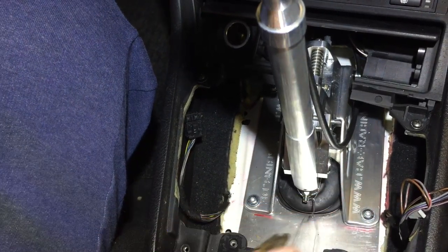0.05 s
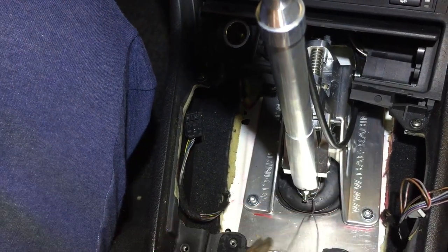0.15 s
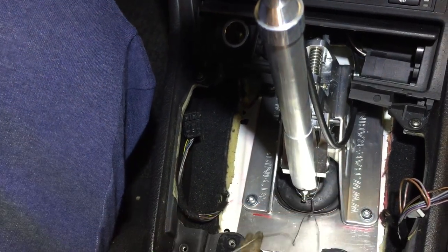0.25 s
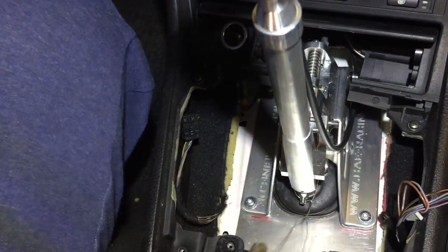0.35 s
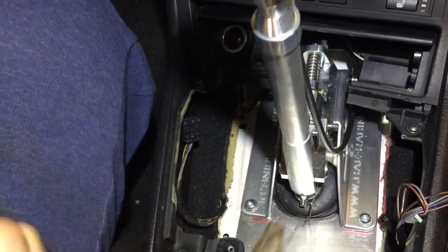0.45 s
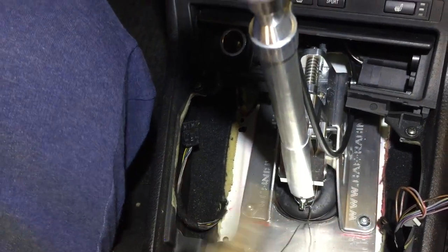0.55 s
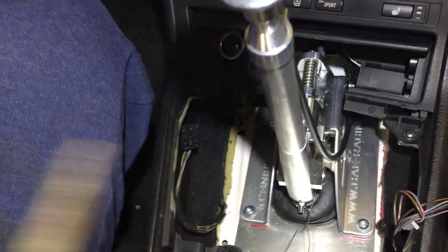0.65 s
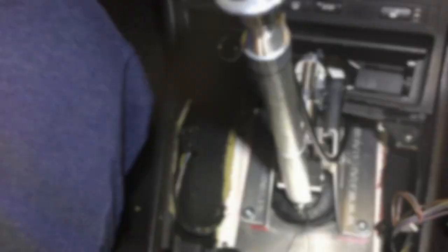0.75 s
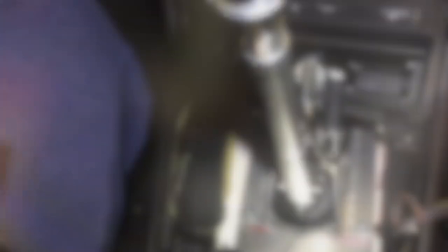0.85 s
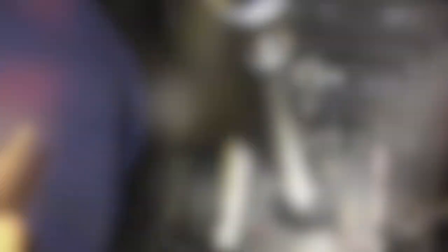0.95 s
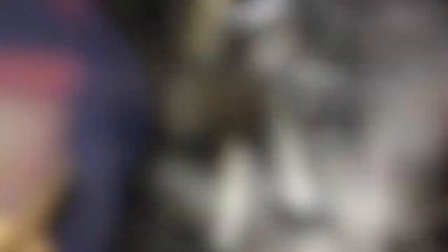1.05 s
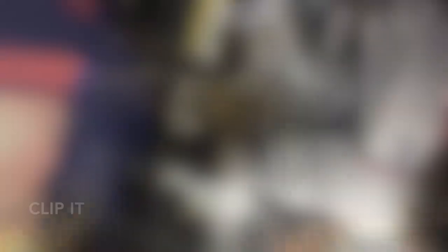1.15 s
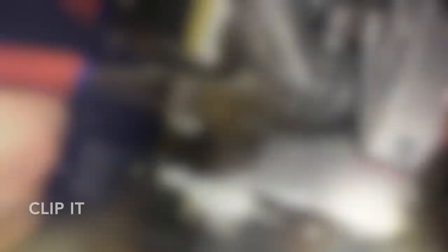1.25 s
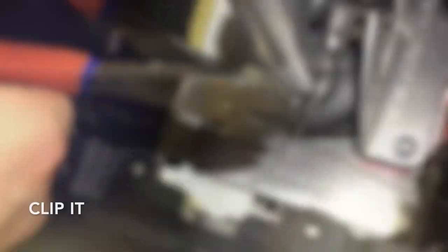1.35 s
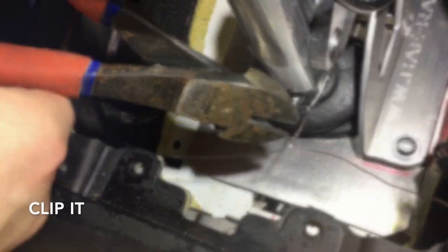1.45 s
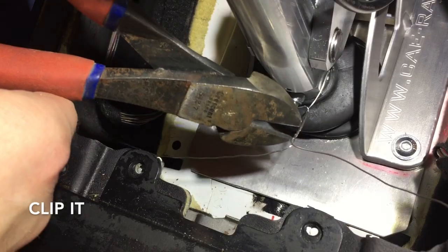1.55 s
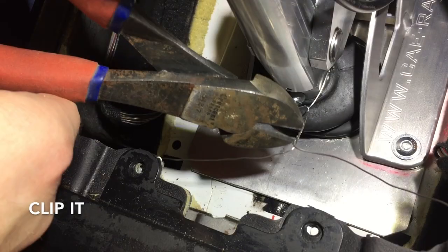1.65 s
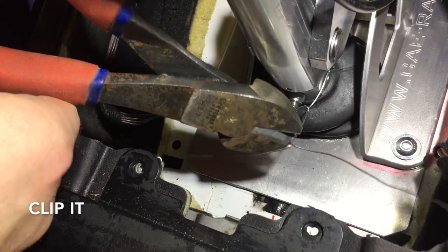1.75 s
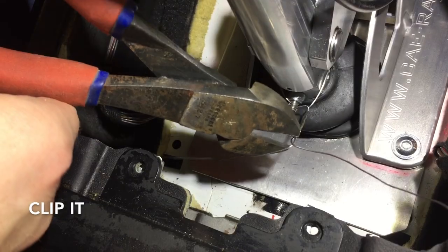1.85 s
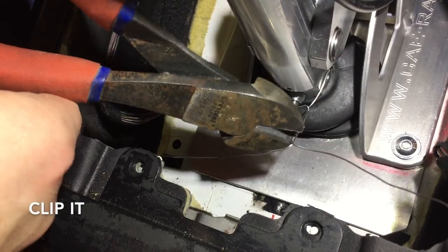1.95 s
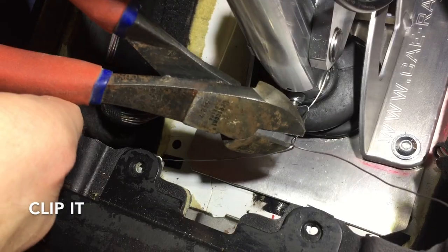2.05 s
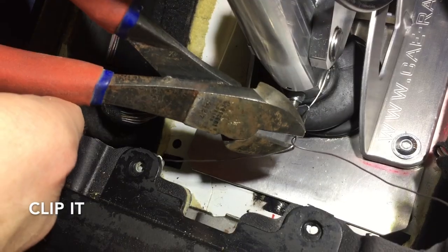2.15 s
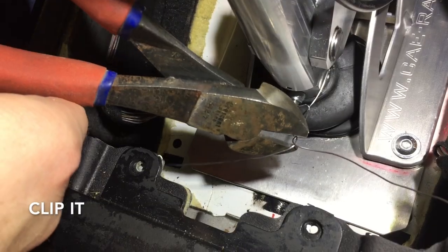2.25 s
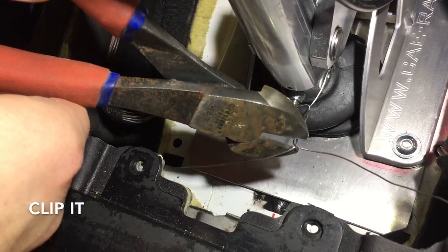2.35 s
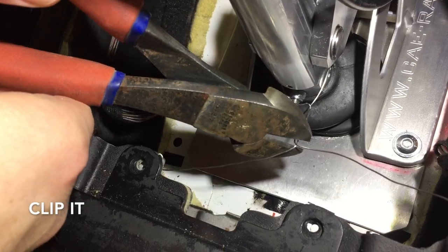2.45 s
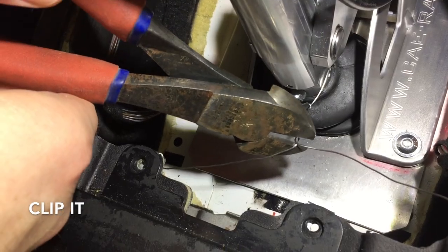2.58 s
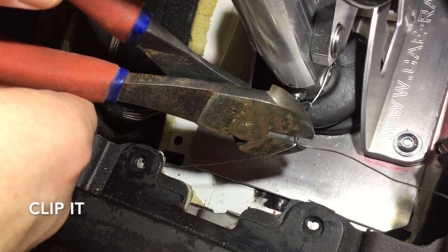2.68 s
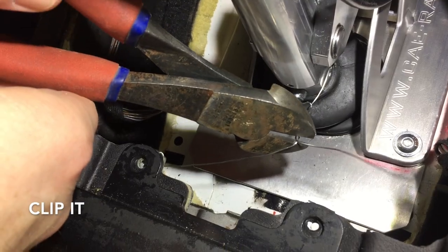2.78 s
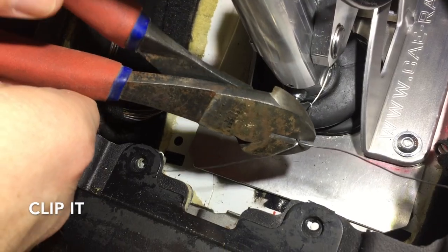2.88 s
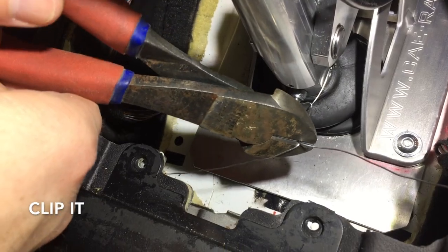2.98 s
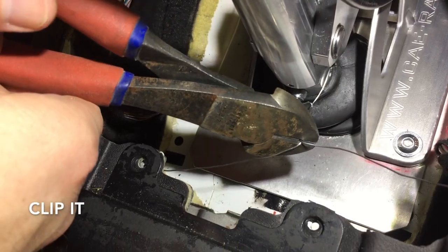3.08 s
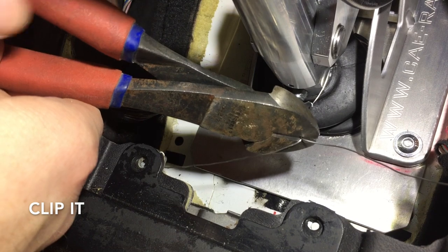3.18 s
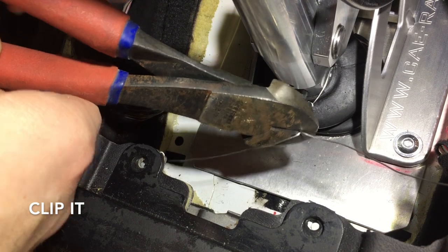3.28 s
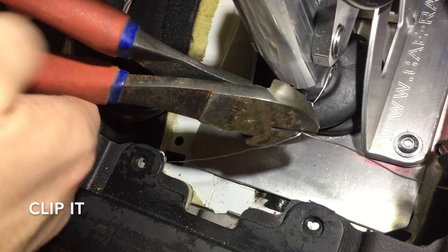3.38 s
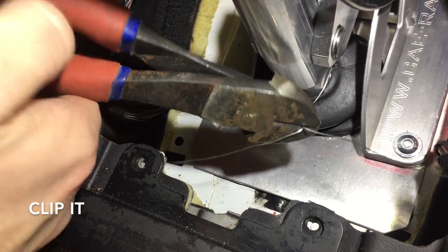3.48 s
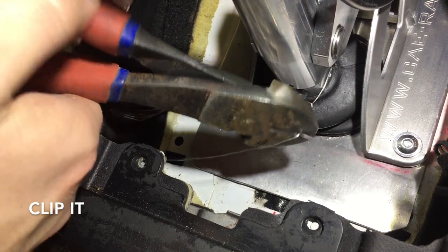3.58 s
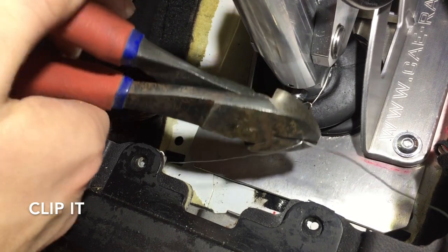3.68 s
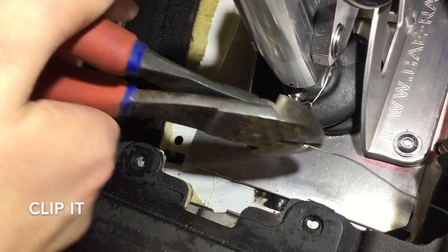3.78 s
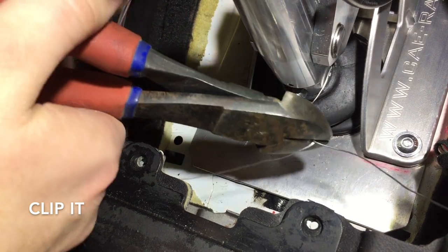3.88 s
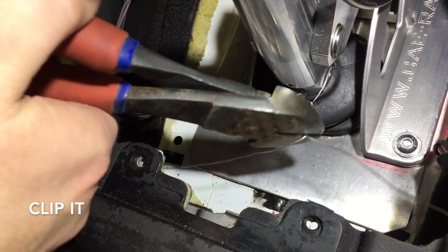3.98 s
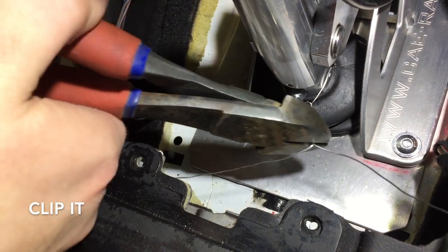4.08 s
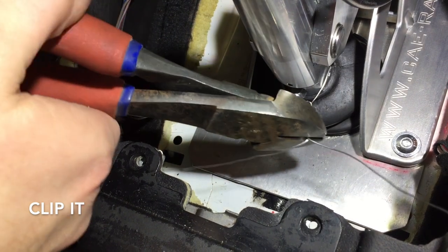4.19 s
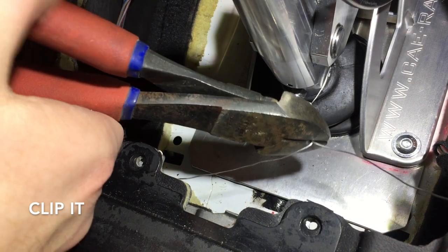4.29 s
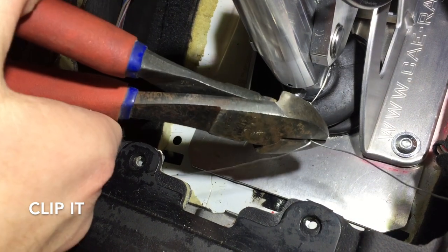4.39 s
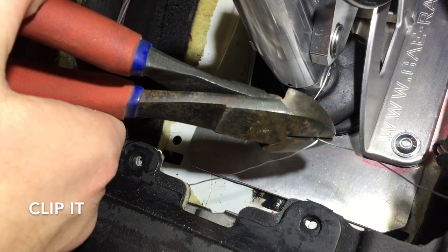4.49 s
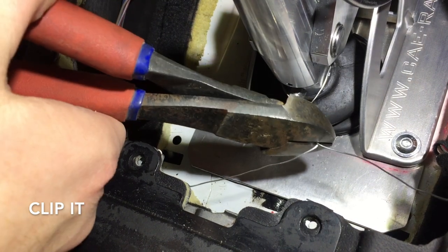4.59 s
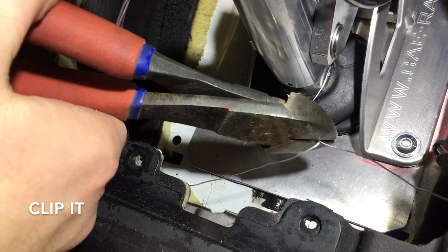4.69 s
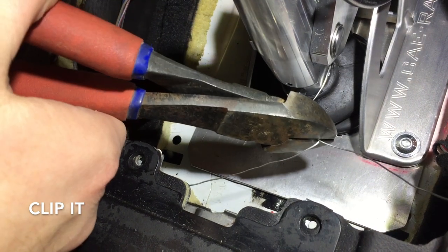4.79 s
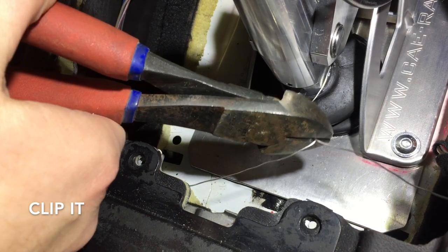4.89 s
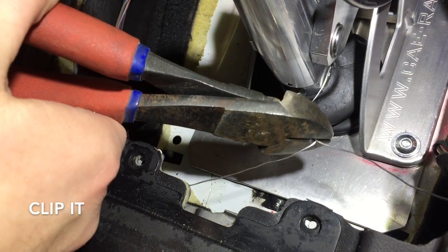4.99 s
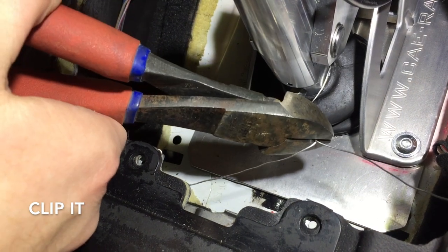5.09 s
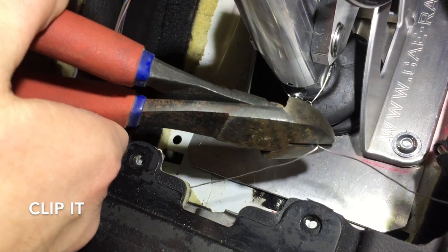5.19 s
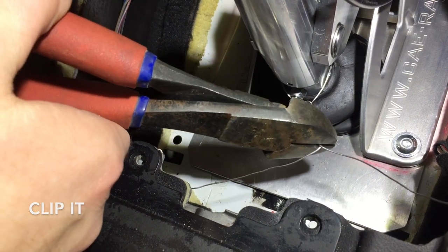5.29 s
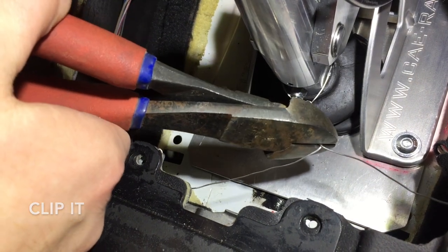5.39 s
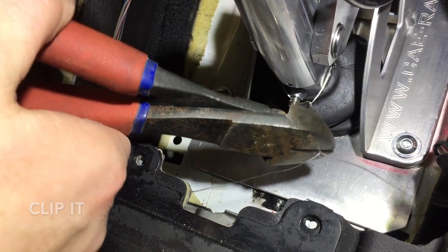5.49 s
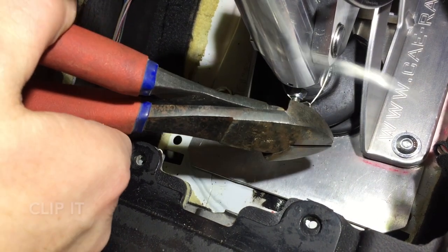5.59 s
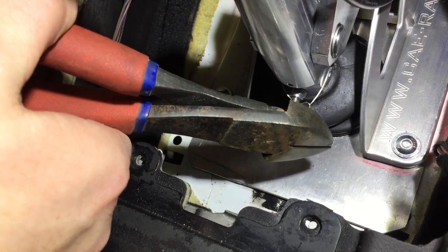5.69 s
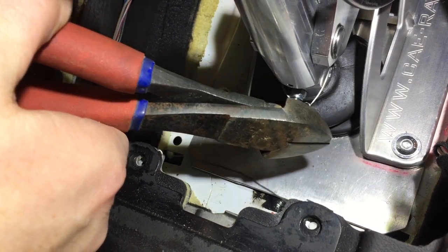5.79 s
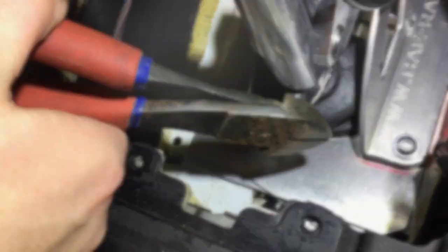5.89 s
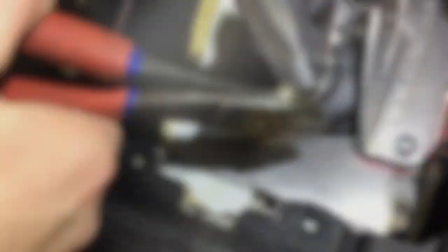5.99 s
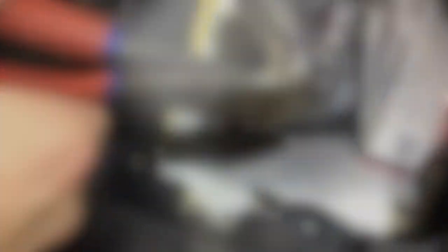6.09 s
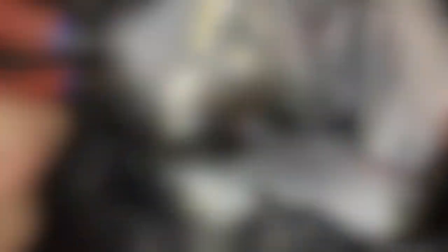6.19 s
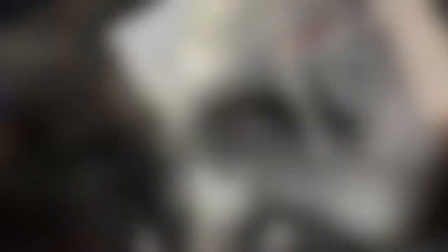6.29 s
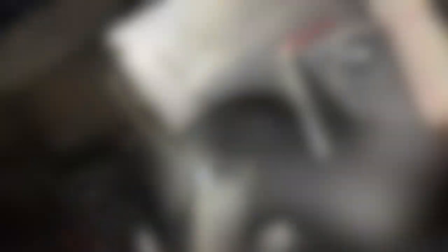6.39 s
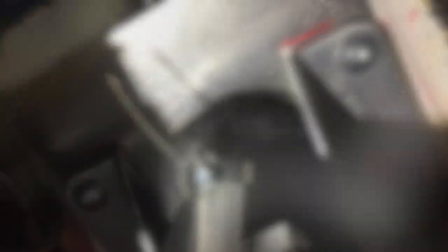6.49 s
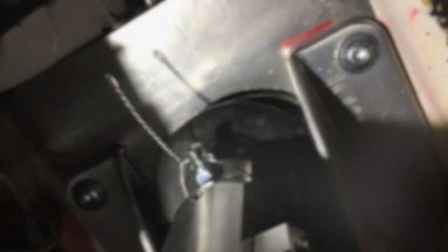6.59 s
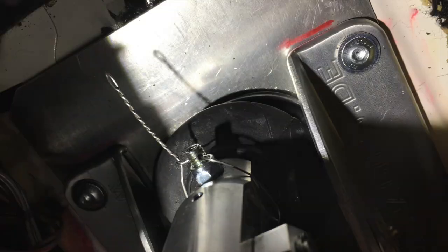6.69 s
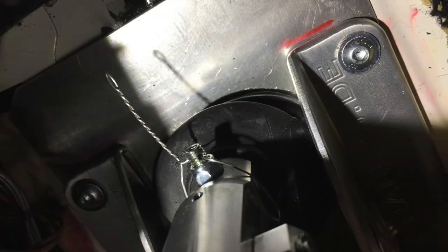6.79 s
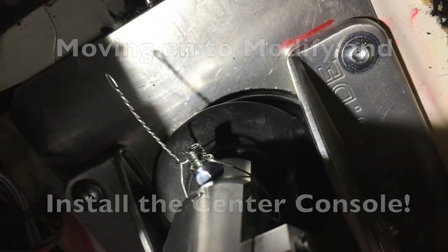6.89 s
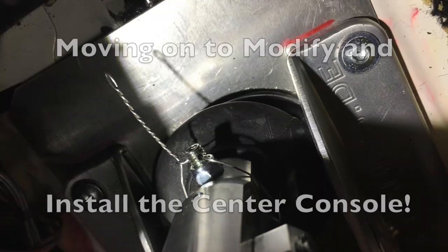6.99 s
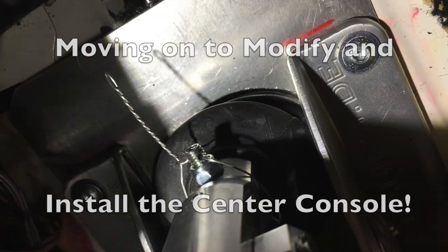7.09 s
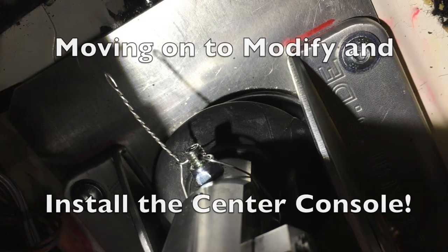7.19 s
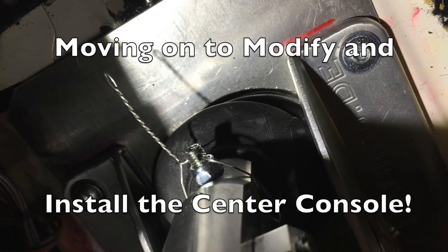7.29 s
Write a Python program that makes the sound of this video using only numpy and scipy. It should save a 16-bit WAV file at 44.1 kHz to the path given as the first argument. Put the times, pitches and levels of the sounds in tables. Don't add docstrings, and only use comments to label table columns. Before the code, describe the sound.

Very close in a small, dry car interior, pliers twist thin wire in quick bright clicks while an engine idles low. The idle melts away into soft distant rumble. Cutters creak drily, knock a metal plate and rub the wire with tiny bright scrapes. A single hard snip cracks far louder than anything else; the cut end rattles and skips away, soft taps follow, and everything fades to silence.

```python
import sys
import numpy as np
from scipy import signal
from scipy.fft import rfft, irfft
from scipy.io import wavfile
from scipy.ndimage import uniform_filter1d

SR = 44100
rng = np.random.default_rng(int(sys.argv[2]) if len(sys.argv) > 2 else 0)


def volts(x):
    e = np.asarray(x, float) / 20
    return 10 ** e


def put_to_file(sound):
    columns = np.atleast_2d(sound).T
    safe = np.clip(columns, -1, 1)
    whole_steps = np.round(safe * 32767)
    wavfile.write(sys.argv[1], SR, whole_steps.astype(np.int16))


N = 324071
T = np.arange(N) / SR
SIZE = 6144


def unit(x):
    return x / np.sqrt(np.mean(x ** 2))


def curves(rows):
    s, *columns = np.transpose(rows)
    return [np.interp(T, s, c) for c in columns], (T >= s[0]) & (T <= s[-1])


def walk(rate_hz):
    k = int(SR / rate_hz)
    held = np.repeat(rng.standard_normal(N // k + 1), k)
    return unit(uniform_filter1d(uniform_filter1d(held, k), k)[:N])


def coloured(spectrum, lo_hz, hi_hz):
    f = np.arange(1, N // 2 + 2) * SR / N
    hz, db = np.transpose(spectrum)
    colour = volts(np.interp(np.log(f), np.log(hz), db))
    edges = 1 / np.sqrt((1 + (lo_hz / f) ** 8) * (1 + (f / hi_hz) ** 8))
    return unit(irfft(rfft(rng.standard_normal(N)) * colour * edges, N))


def contacts(events, body, low_hz, high_hz, slips_per_s, scatter_db, rise_s, fall, wander, widen=1.5, order=2,
             favour_db=10, first_db=0, grab_db=0):
    out, t = np.zeros(N + SIZE), np.arange(SIZE) / SR
    f = np.arange(1, SIZE // 2 + 2) * SR / SIZE
    low, high = 1 / (1 + (f / low_hz) ** 6), 1 / (1 + (high_hz / f) ** 6)
    centre, width, db = (c[:, None] for c in np.transpose(body))
    for s, peak_db, length, low_db, high_db in events:
        chance = rng.random((5, SIZE))
        length = np.clip(length, .001, .08)
        slip_size = volts(-scatter_db * np.log(chance[2].clip(.02)))
        slips = (chance[0] < slips_per_s / SR) * np.sign(chance[1] - .5) * slip_size
        slips[0] = volts(1.6 * scatter_db + first_db)
        force = slips * np.minimum((t + 1 / SR) / rise_s, 1) * np.clip(1 - t / length, 0, 1) ** fall
        force = force * volts(grab_db * (np.repeat(chance[3, -32:], SIZE // 32) - .5))
        hz = centre * (1 + wander * 2 * (chance[4, :len(db), None] - .5))
        signs = (-1) ** np.arange(len(db))[:, None]
        gains = volts(db + favour_db * (chance[3, :len(db), None] - .5)) * signs
        damping = 1j * f * widen * width
        mode = damping / (hz ** 2 - f ** 2 + damping)
        ring = rfft(force) * (gains * mode ** order).sum(0)
        parts = [irfft(ring * w, SIZE) for w in (1 - low - high, low, high)]
        range_db = (0, low_db + 8.5, high_db + 10.5)
        ring = sum(volts(g) * p / np.abs(p).max() for p, g in zip(parts, range_db))
        ring = np.roll(ring, 64) * (1 - t / t[-1])
        i = int(s * SR) - 64
        out[i:i + SIZE] += volts(peak_db) * ring
    return out[:N]


# pitch_hz, width_hz, level_db
PLIERS = [(2070, 117, -2.5), (2477, 120, 5), (3000, 390, -5), (3270, 300, -7), (5590, 310, -7),
          (6390, 270, -4), (8300, 460, -27), (9730, 1500, -11.5), (12430, 610, -10.5), (14500, 820, -10),
          (4200, 700, -13), (850, 2000, -10), (7200, 18000, -23)]
# start_s, level_db, high_db (hardness)
TURNS = [(0.097, -31, -10), (0.1256, -34.5, -15), (0.162, -43.5, -9), (0.1921, -29, -12), (0.2153, -48, 0),
         (0.2342, -38.5, -14), (0.2683, -40.5, -15), (0.2858, -43.5, -9.5), (0.3046, -41.5, -15),
         (0.336, -54, -11), (0.4158, -52, 3), (0.4226, -39.5, -37), (0.4407, -42.5, -15),
         (0.4557, -40.5, -14), (0.4709, -37, -16), (0.5328, -40, -12.5), (0.5483, -39, -19),
         (0.576, -42.5, -12), (0.6151, -40.5, -12.5), (0.7007, -41.5, -19), (0.715, -48.5, -21),
         (0.7817, -44.5, -14.5), (0.853, -50, -30), (1.069, -51, -28)]
# start_s, level_db, length_s
SPINS = [(0.023, -63, .079), (0.12, -63, .079), (.2399, -39.5, 0.068), (.04, -53, .06), (.35, -58, .07),
         (.47, -46, .03), (.635, -54, .05), (.725, -54, .055), (.8, -56, .05), (.862, -54, .03),
         (.915, -61, .06), (1.01, -61, .05), (1.17, -65, .07)]


def pliers():
    events = [(s, db, n, -22, -19) for s, db, n in SPINS]
    events += [(s, db, .023, -31 - .6 * hi, hi) for s, db, hi in TURNS]
    return contacts(events, PLIERS, 2280, 7700, slips_per_s=7200, scatter_db=5.5, rise_s=.0001, fall=1.58,
                    wander=.025, favour_db=9, first_db=5, grab_db=3)


# pitch_hz, width_hz, level_db
HINGE = [(1370, 42, -9), (1984, 200, 5), (3076, 330, -4), (3140, 140, -3), (3930, 260, -2),
         (5330, 200, -14), (6100, 300, -8), (8100, 180, -6), (8600, 100, -4), (9920, 200, -10),
         (11600, 280, -14), (2860, 5450, -17)]
# start_s, level_db, length_s, high_db (hardness)
CREAKS = [(2.472, -61, 0.12, -25), (1.3686, -61, .02, -38), (1.8267, -52.5, 0.026, -10.5),
          (1.8345, -52.5, 0.016, -15), (1.8934, -38.5, 0.019, -29), (1.9253, -43.5, 0.021, -28),
          (1.9637, -45, 0.021, -32), (2.1226, -57, 0.013, -22), (2.448, -60, 0.024, -14),
          (3.089, -62, .015, -18), (3.5685, -49.5, 0.021, -7.5), (3.5985, -49.5, 0.029, 0.5),
          (3.6473, -38.5, 0.025, -17), (3.6863, -39, 0.022, -22), (2.8915, -51, 0.056, -27),
          (3.716, -33.5, 0.037, -22), (4.3385, -47.5, 0.058, -9)]


def hinge():
    events = [(s, db, n, -45 - .47 * db - .063 * hi, hi) for s, db, n, hi in CREAKS]
    return contacts(events, HINGE, 980, 4400, slips_per_s=3500, scatter_db=4, rise_s=.00034, fall=.8,
                    wander=.017, grab_db=8)


# pitch_hz, width_hz, level_db
PLATE = [(183, 127, 10), (253, 150, 7.5), (377, 80, 10.5), (680, 290, 0.5), (1120, 240, 7), (1520, 230, 3),
         (2306, 1030, 3), (2553, 74, 3.5), (3900, 140, -18), (6000, 2000, -20), (1990, 3600, -22)]
# start_s, level_db, low_db (weight), high_db (hardness)
KNOCKS = [(0.2146, -47, 7, -3), (.6884, -60.5, 6, 2), (0.9939, -44, -3.5, -9.5), (1.275, -47.5, -11.5, -48),
          (1.4252, -43.5, -7.5, -55), (2.2575, -36, -13, -25.5), (2.531, -55, -24, -28),
          (3.0488, -32.5, -17, -13), (3.281, -36, -10, -18), (3.2915, -34, -15, -16.5),
          (3.8609, -43.5, -2.5, -18.5), (4.1086, -60, 12, -24), (4.9182, -52, -10, -41),
          (1.089, -53, -19, -40), (4.468, -62, -15, -30), (4.65, -60, -20, -40), (4.775, -64, -15, -40),
          (5.23, -61, -20, -30), (5.338, -63, -15, -35)]


def floor_plate():
    events = [(s, db, .012, lo, hi) for s, db, lo, hi in KNOCKS]
    return contacts(events, PLATE, 664, 2700, slips_per_s=4200, scatter_db=3, rise_s=.00044, fall=1.76,
                    wander=.028, widen=1.4, favour_db=6)


# pitch_hz, width_hz, level_db
WIRE = [(2453, 100, -12), (3420, 100, -11), (4520, 100, -10), (5640, 60, 15), (6900, 330, -5),
        (8190, 420, 7.5), (9700, 520, -3), (9700, 410, -7), (12000, 200, -6), (14000, 310, -16),
        (15230, 390, -22), (10200, 4200, -30.5)]
# start_s, level_db, length_s
RUBS = [(4.492, -50.5, 0.027), (3.835, -69, 0.02), (3.959, -64, .042), (4.17, -49.5, 0.033),
        (4.286, -55.5, 0.027), (4.943, -54, .02), (3.917, -56, 0.052), (4.004, -54.5, 0.034),
        (4.217, -60, 0.044), (4.3131, -51, 0.047), (4.519, -48.5, 0.046), (4.188, -54, .02),
        (3.372, -71, .05), (3.214, -74, .008), (5.535, -68, .02)]


def rubbed_wire():
    events = [(s, db, n, -11, -43.5 - .57 * db) for s, db, n in RUBS]
    return contacts(events, WIRE, 3900, 12000, slips_per_s=4400, scatter_db=4, rise_s=.0051, fall=.43,
                    wander=.011, widen=1.9, grab_db=12)


# pitch_hz, width_hz, level_db
JAWS = [(73, 73, -7.5), (171.2, 210, -15), (470, 240, -22), (1300, 320, -24.5), (2189, 320, -13),
        (3886, 300, 0.5), (4300, 160, 1.5), (4720, 250, -2), (5364, 300, -6.5), (5800, 300, -7),
        (6740, 200, -6), (7250, 250, -4), (7950, 200, -7), (8865, 400, -8), (10500, 320, -17),
        (11400, 400, -19.5), (12800, 270, -20), (14200, 500, -22), (7100, 4500, -17.5)]
# start_s, level_db, length_s, low_db, high_db
SNIP = [
    (5.6031, 5, .003, -35, -23.5),
    (5.6058, -16, .007, -27.5, -22),
]
# start_s, level_db, length_s, low_db, high_db
SNIP_TAIL = [
    (5.607, -27, .03, -22, -22),
    (5.612, -40, .08, -18, -24),
    (5.64, -52, .08, -14, -26),
]


def snip():
    crack = contacts(SNIP, JAWS, 700, 9500, slips_per_s=9000, scatter_db=1, rise_s=.00002, fall=.43,
                     wander=.0016, widen=1, order=1, favour_db=1, first_db=12.5)
    shiver = contacts(SNIP_TAIL, JAWS, 700, 9500, slips_per_s=12000, scatter_db=1.5, rise_s=.001, fall=2.2,
                      wander=.003, order=1, favour_db=4)
    return crack + shiver


# pitch_hz, width_hz, level_db
OFFCUT = [(990, 250, -15.5), (1600, 400, -9), (2454, 500, -10.5), (3120, 580, -15.5), (4100, 330, -8),
          (5720, 530, -2), (7400, 400, -5), (8800, 160, -15.5), (9500, 350, -7), (11500, 610, -13.5),
          (12700, 500, -15.5), (13056, 400, -14.5), (14340, 400, -17.5), (7040, 10000, -12)]
# start_s, level_db, length_s
SLIDES = [
    (5.768, -42, .03),
    (5.81, -45, .03),
    (5.854, -44, 0.03),
    (5.885, -47, .025),
    (5.916, -39, .05),
    (6.236, -52, .022),
]
# start_s, level_db, low_db (weight)
BOUNCES = [(5.5797, -46.5, -23.5), (5.592, -49.5, -21), (5.672, -49.5, -7), (5.7036, -49.5, 0),
           (5.7224, -40.5, -24.5), (5.7437, -27, -39), (5.7652, -24.5, -19), (5.7872, -33.5, -21),
           (5.8057, -29.5, -32), (5.8142, -41.5, -1), (5.8287, -27, -16.5), (5.8488, -22.5, -13.5),
           (5.8802, -29, -22), (5.896, -26, -21), (5.9138, -26.5, -29), (5.9244, -41, -10),
           (5.9345, -37, -19), (5.9564, -44, -4), (0.9943, -47.5, -1), (3.3702, -61, -15),
           (3.4156, -60.5, -11), (3.2815, -47.5, -17), (4.9463, -53, -20), (6.5935, -60, -29),
           (4.176, -58, -20), (5.843, -42, -20), (5.866, -45, -25), (6.128, -58, -25), (6.397, -56, -25),
           (6.247, -50, -15), (.679, -62, -25)]


def offcut():
    events = [(s, db, n, -4, -17) for s, db, n in SLIDES]
    events += [(s, db, .0075, lo, -25 - .33 * db) for s, db, lo in BOUNCES]
    return contacts(events, OFFCUT, 4510, 9700, slips_per_s=10000, scatter_db=4.5, rise_s=.00022, fall=2.2,
                    wander=.015, widen=1.1, favour_db=13, first_db=4)


# pitch_hz, width_hz, level_db
TRIM = [(400, 240, 0.5), (740, 230, -8.5), (1010, 150, 4.5), (1530, 300, -1.5), (2380, 1000, 3.5),
        (4000, 450, -11), (5130, 600, -4.5), (6800, 1000, -14), (11900, 8000, -20), (3033, 11000, -16)]
# start_s, level_db, length_s
BRUSHES = [(6.066, -58, 0.031), (6.165, -57, 0.082), (6.236, -51.5, .032), (6.4, -56, 0.091),
           (5.97, -58, .04), (6.1, -58, .05), (6.19, -57, .045), (6.28, -62, .06), (6.49, -62, .06),
           (5.63, -56, .04)]
# start_s, level_db, low_db (weight), high_db (hardness)
TRIM_TAPS = [(5.8845, -37.5, -9.5, -8.5), (6.0295, -41, -22, -19.5), (6.11, -50, -1.5, -35),
             (6.1498, -32, -10.5, -32), (6.1875, -55.5, 1, -18), (6.2439, -42.5, -9.5, -3.5),
             (6.2716, -51.5, -0.5, -28), (6.3971, -46, -25, -6), (6.4174, -54.5, -1, -21),
             (6.4736, -60, 3, -17), (6.4981, -50.5, -2.5, -28), (6.557, -59, -9, -26),
             (6.5926, -55, -3, -14), (6.6083, -56.5, -8, -23), (6.7375, -78.5, 2, -27),
             (2.545, -62, -3, -30)]


def trim():
    events = [(s, db, n, -12, -18) for s, db, n in BRUSHES]
    events += [(s, db, .011, lo, hi) for s, db, lo, hi in TRIM_TAPS]
    return contacts(events, TRIM, 1250, 4800, slips_per_s=3500, scatter_db=5.5, rise_s=.00048, fall=2.6,
                    wander=.07, widen=2.1)


# pitch_hz, width_hz, level_db
CLASP = [(2600, 300, -6), (3650, 400, 0), (4400, 300, -2), (6800, 600, -9), (4000, 5000, -18)]
# start_s, level_db, length_s
CLINKS = [
    (6.009, -42, .012),
    (6.0525, -47, .012),
    (6.1743, -48, .006),
    (4.968, -60, .01),
    (5.642, -50, .006),
]


def clasp():
    events = [(*c, -30, -30) for c in CLINKS]
    return contacts(events, CLASP, 1500, 9000, slips_per_s=4000, scatter_db=4.5, rise_s=.0004, fall=1.1, wander=.03)


# pitch_hz, level_db per Hz
AIR = [(150, -35), (250, -0.5), (401, -12), (495, -14), (559, -14), (913, -15.5), (1660, -25.5),
       (2950, -28.5), (3700, -30.5), (8000, -35.5), (10200, -38.5), (15000, -40.5), (16400, -51.5)]


def rustle(touches):
    busy = uniform_filter1d(np.abs(touches), int(.07 * SR)).clip(0)
    return coloured(AIR, 1280, 16400) * busy ** .67 * volts(-30 + 1.3 * walk(40))


def handwork():
    moving = pliers() + hinge() + rubbed_wire() + offcut() + trim() + clasp()
    return moving + floor_plate() + rustle(moving) + snip()


def cabin(work):
    t60_s, level_db, cutoff_hz = .081, -16, 1450
    t = T[:SIZE]
    tail = rng.standard_normal(SIZE) * volts(-60 * t / t60_s) * (t > .003)
    tail = signal.sosfilt(signal.butter(4, cutoff_hz, fs=SR, output="sos"), tail)
    return volts(level_db) * signal.fftconvolve(work, tail / np.sqrt(np.sum(tail ** 2)))[:N]


# start_s, length_s, pitch_hz,
# level_db
SCUFFS = [(2.202, 0.233, 2340, 3), (2.06, .06, 2050, 2), (2.47, .1, 2050, 1), (4.59, 0.15, 2840, 4),
          (4.75, .16, 2850, -6), (5.15, .09, 3100, 4), (1.38, .13, 3300, 2), (5.59, .012, 3100, 11),
          (6.64, .14, 2600, -20), (4.9, .68, 510, 6)]


def scuffs():
    level_db, width_hz, glide = -78, 300, -.04
    out = 0
    for s, length, hz, db in SCUFFS:
        done = np.clip((T - s) / length, 0, 1)
        tone = np.sin(2 * np.pi * np.cumsum(hz * (1 + glide * (done - .5))) / SR)
        out = out + volts(db) * tone * np.sqrt(np.sin(np.pi * done).clip(0))
    return volts(level_db + 3 * walk(30)) * walk(width_hz) * out


# start_s, length_s, level_db
SLEEVE = [(0.0, .1, -72), (.35, .07, -72), (3.29, .13, -77), (4.09, .09, -75), (4.35, .06, -73),
          (6.22, .05, -67), (3.76, .04, -75)]


def sleeve():
    swell = 0
    for s, length, db in SLEEVE:
        swell = swell + volts(db) * np.sin(np.pi * np.clip((T - s) / length, 0, 1)).clip(0)
    return swell * coloured([(1000, 0), (16000, -3)], 7000, 16400) * volts(2.5 * walk(90))


# start_s, half_turn_rate_hz, level_db
IDLE = [
    (0.0, 19, -44),
    (0.092, 16.26, -37.5),
    (0.736, 16.9, -37),
    (1.4, 17.1, -56),
]
# multiple, level_db
IDLE_ORDERS = [(3, -28.5), (4, 3), (5, -0.5), (6, -6), (7, -22), (8, 1.5), (9, -13.5), (10, -5.5),
               (11, -11), (13, -31)]
# start_s, pitch_hz, level_db
DRONE = [
    (0.8, 154.9, -56),
    (1.036, 165.6, -48.5),
    (1.976, 159, -65.5),
    (2.008, 161, -52.5),
    (2.2, 170, -76),
]


def engine():
    (hz, db), on = curves(IDLE)
    turn = 2 * np.pi * np.cumsum(hz) / SR
    idle = 0
    for k, g in IDLE_ORDERS:
        phase = k * turn + 6 * rng.random() + .084 * walk(6.9)
        idle = idle + volts(g + 1.6 * walk(5.8)) * np.sin(phase)
    idle = unit(idle) * volts(db - 1.5) * uniform_filter1d(1. * on, 4000)
    (far_hz, far_db), far_on = curves(DRONE)
    drone = np.sqrt(2) * np.sin(2 * np.pi * np.cumsum(far_hz) / SR)
    return idle + drone * volts(far_db) * uniform_filter1d(1. * far_on, 4000)


# pitch_hz, level_db per Hz
BOOM = [(15, -43), (25, -27.5), (43, -1.5), (65, 9.5), (87, -7), (113, -7.5), (173, -13), (199, -18.5),
        (231, -18.5), (330, -35), (430, -64.5), (730, -120)]
# start_s, end_s, pitch_hz, level_db
WHINE = [
    (2.45, 6.4, 15580, -93),
    (3.395, 5.9, 7790, -92),
]
# start_s, swell_db
SURGES = [
    (2.52, 2),
    (3.58, 5),
    (4.2, 3.5),
    (5.26, 8.5),
]


def garage():
    first = np.interp(T, (.99, 1.49), [1, 0])
    second = np.interp(T, (.21, 2.16), [0, 1])
    fade = np.interp(T, (6.01, 6.76), [1, 0]) ** 1.18
    rise_s, fall_s = .07, .12
    surge_db = sum(np.interp(T, [s - rise_s, s, s + fall_s], [0, db, 0]) for s, db in SURGES)

    def level(first_db, second_db, surge_share):
        return np.hypot(volts(first_db) * first, volts(second_db + surge_share * surge_db) * second)

    boom = coloured(BOOM, 42, 95) * level(-51, -51, 1.5)
    rumble = coloured(BOOM, 95, 330) * level(-50, -52.5, .42) * volts(1.5 * walk(4))
    murmur = coloured(AIR, 280, 2200) * level(-67.5, -68, -.05) * volts(.71 * walk(6))
    hiss_level = np.hypot(level(-73.5, -80.5, -.18), volts(-81))
    hiss = coloured(AIR, 2200, 16400) * hiss_level * volts(.8 * walk(5))
    whine = 0
    for start, end, hz, db in WHINE:
        whine = whine + volts(db + 1.7 * walk(3.3)) * np.sin(2 * np.pi * hz * T) * (T > start) * (T < end)
    return (boom + rumble + murmur + hiss + whine) * fade


def scene():
    work = handwork()
    return (work + cabin(work) + scuffs() + sleeve() + engine() + garage())[None]


def roll_off(x):
    return signal.sosfilt(signal.butter(12, 16810, fs=SR, output="sos"), x)


def record(dry):
    rounded = .55 * np.tanh(dry / .63) * (T < 6.79)
    top = signal.cheby2(12, 32, 16150, fs=SR, output="sos")
    return roll_off(signal.sosfilt(top, rounded))


dry = scene()
out = record(dry)
put_to_file(out)
```